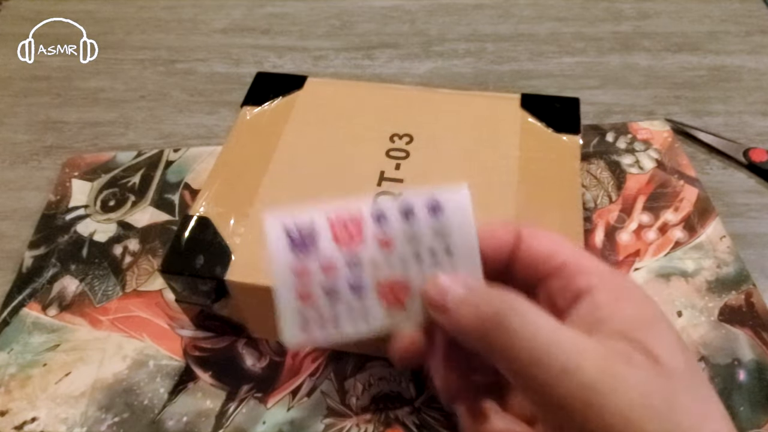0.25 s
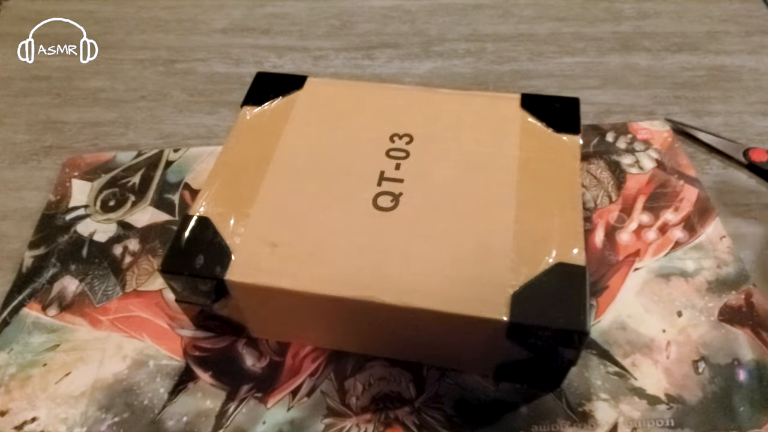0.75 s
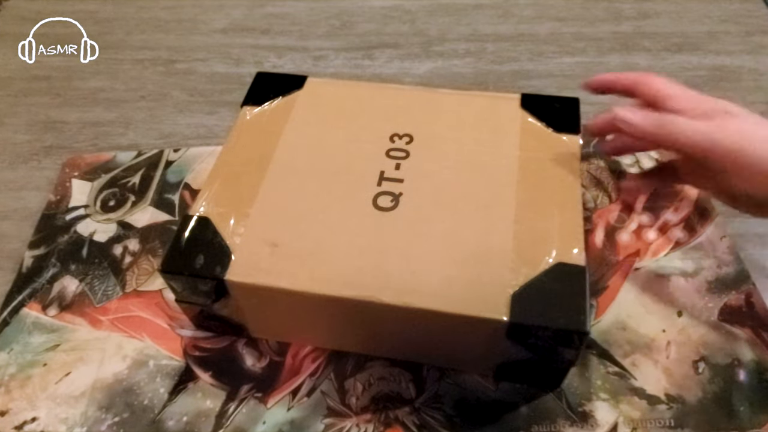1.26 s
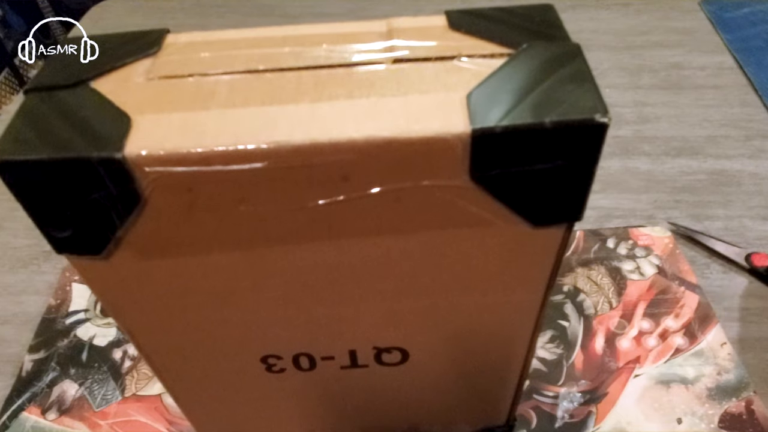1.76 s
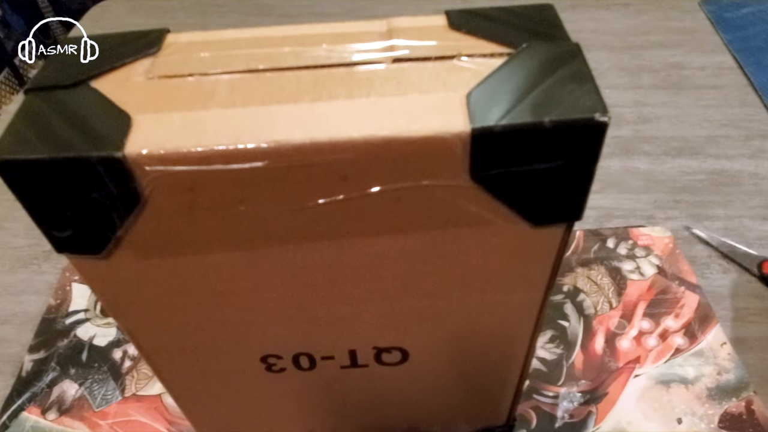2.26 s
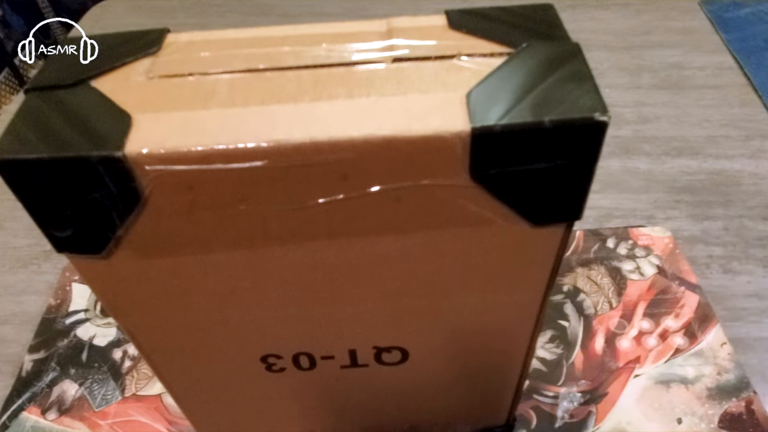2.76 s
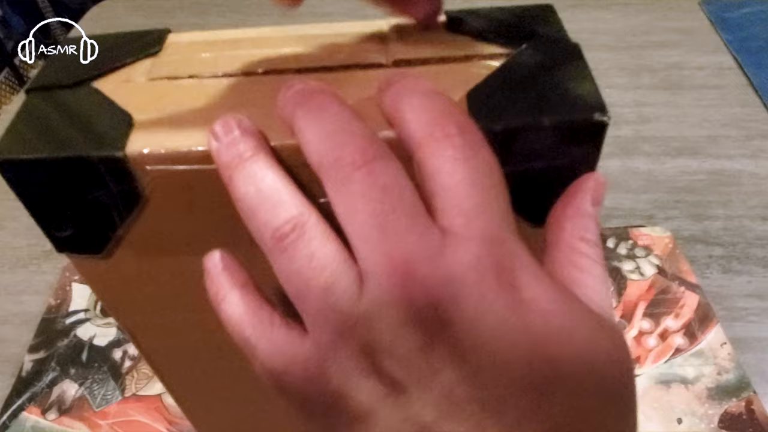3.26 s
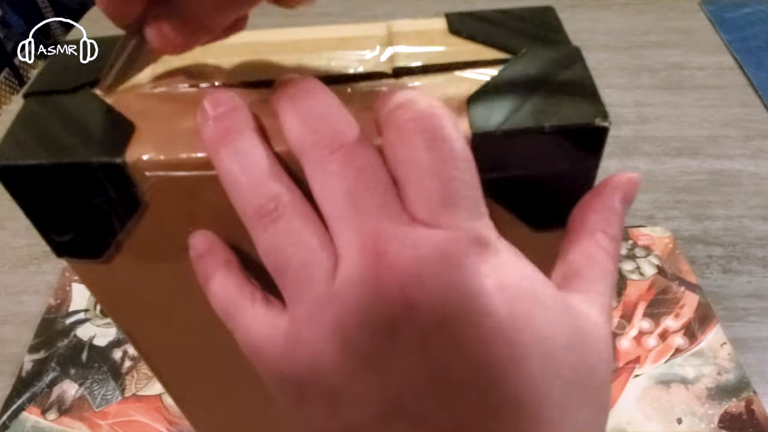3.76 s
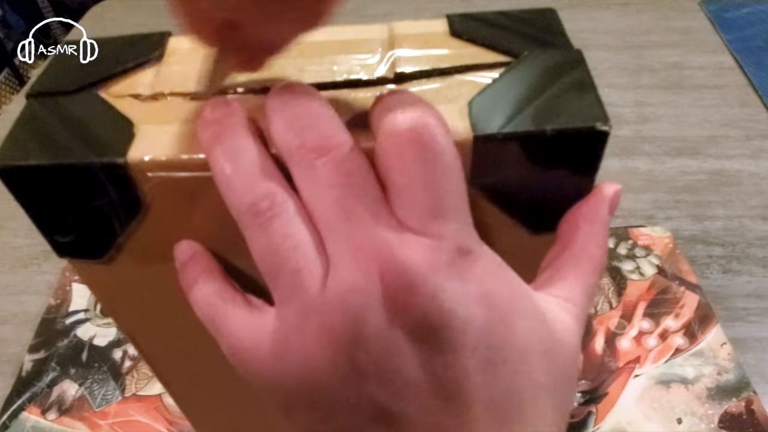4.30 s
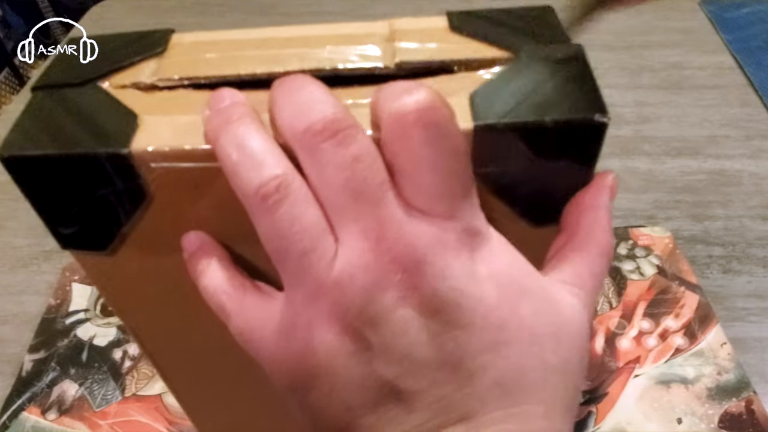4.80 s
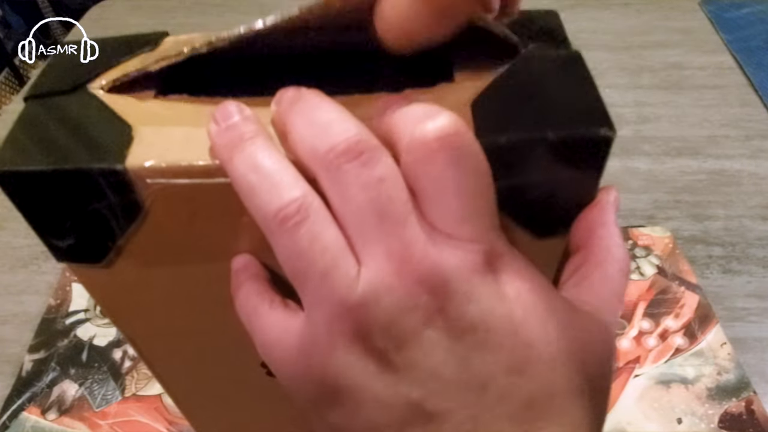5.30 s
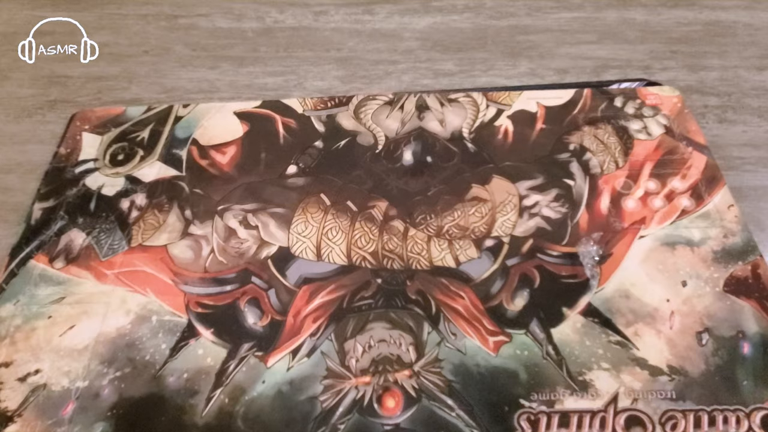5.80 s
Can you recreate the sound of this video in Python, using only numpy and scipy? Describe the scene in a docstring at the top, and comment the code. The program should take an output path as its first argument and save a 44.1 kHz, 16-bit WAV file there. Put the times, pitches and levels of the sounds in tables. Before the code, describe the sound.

In a small quiet room, very close stereo microphones catch faint rustling of a sticker sheet and soft hand touches on a taped cardboard box. The box is set down with a light clack, then tapped and scuffed. A blade pricks the tape, then tears along it in loud, crackling rips with hollow box thumps. The flap creaks and snaps open, and an abrupt cut brings a smooth hissing slide over a mat.

```python
"""Opening a taped cardboard box

Hands handle a sticker sheet and a taped box in a small quiet room, close to a pair of microphones. A blade slits
the tape, the flap creaks and snaps open, and a smooth slide follows. Snaps are clicks, creaks are trains of slips
and rubbing is shaped noise; they excite table, box, panels, tape and crinkle. Four shots are spliced together, so
the echo stops dead at each splice."""
import sys
import numpy as np
from scipy import signal
from scipy.fft import rfft, irfft
from scipy.io import wavfile
from scipy.ndimage import uniform_filter1d

SR = 44100
rng = np.random.default_rng(int(sys.argv[2]) if len(sys.argv) > 2 else 0)


def digitize_waveform(pressure):
    """Quantize a signal to 16-bit integers and store it at the path in sys.argv[1].

    Rows of a 2-D input are taken as channels; values are limited to [-1, 1].
    """
    field = np.atleast_2d(pressure).T
    bounded = np.clip(field, -1, 1)
    quanta = np.round(bounded * 32767).astype(np.int16)
    wavfile.write(sys.argv[1], SR, quanta)


def elevation(decibels):
    """Turn decibel levels (scalar or array-like) into linear amplitude ratios."""
    levels = np.asarray(decibels, float)
    return 10 ** (levels / 20)


N = 266584

# Where each shot starts, and last the end of the final one. Each entry: time in seconds.
SPLICES = [0, 1.565, 4.901, 5.772, 6.05]
# Left-right likeness of spread sound. Each row: frequency in Hz, likeness from 0 to 1.
SAME = [(60, 0.99), (300, 0.88), (700, 0.4), (1500, 0.1), (3000, 0.014)]


def read(points, hz):
    """Reads a table on a log-frequency axis."""
    f, value = np.transpose(points)
    return np.interp(np.log(hz + 1), np.log(f + 1), value)


def evened(x):
    """Scales to rms 1."""
    return x / np.sqrt(np.mean(x ** 2) + 1e-20)


def colour(points):
    """Causal, minimum-phase impulse response of a spectrum in dB, energy 1."""
    gain_db = np.maximum(read(points, abs(np.fft.fftfreq(4096, 1 / SR))), -100)
    log_gain = np.log(elevation(gain_db))
    taps = np.fft.ifft(np.exp(np.conj(signal.hilbert(log_gain)))).real[:2048]
    return taps / np.linalg.norm(taps)


def ring(modes, low_hz):
    """Impulse response of damped modes that start together, high-passed at low_hz, energy 1."""
    t = np.arange(8192) / SR
    taps = np.zeros(len(t))
    for hz, width_hz, db in modes:
        decay = np.sqrt(width_hz) * np.exp(-np.pi * width_hz * t)  # a wider mode dies sooner
        taps += elevation(db) * decay * np.sin(2 * np.pi * hz * t)
    taps = signal.sosfilt(signal.butter(2, low_hz, "high", fs=SR, output="sos"), taps)
    return taps / np.linalg.norm(taps)


def through(x, taps):
    """Convolves shot by shot: whatever still rings is cut off at the splice."""
    edges = [min(round(s * SR), N) for s in SPLICES]
    taps = np.atleast_2d(taps)
    shots = [signal.oaconvolve(x[:, a:b], taps, axes=1)[:, :b - a] for a, b in zip(edges, edges[1:])]
    return np.hstack(shots)


def pair():
    """White noise at two microphones, alike in the bass."""
    a, b = rfft(rng.standard_normal((2, N)))
    same = np.clip(read(SAME, np.fft.rfftfreq(N, 1 / SR)), -1, 1)
    return irfft([a, same * a + np.sqrt(1 - same ** 2) * b], N)


def leaned(pan_db):
    """Gains of left and right, pan_db apart."""
    return elevation(np.array([[.5], [-.5]]) * pan_db)


def placed(x, pan_db):
    """Puts a sound to one side: softer and later at the far microphone."""
    lag_s_per_db = .00003
    lag = round(np.clip(-pan_db * lag_s_per_db * SR, -14, 14))  # samples; positive delays the left
    return leaned(pan_db) * np.array([np.roll(x, max(lag, 0)), np.roll(x, max(-lag, 0))])


def parts(shake, thump, knock, crack, sparkle):
    """Five drives, each into the part that it rings: table, box, panels, tape, crinkle."""
    # Modes of the table top under the box. Each row: frequency in Hz, width in Hz, level in dB.
    table_modes = [(55.7, 12, -9), (76, 12, 1.5), (96, 28, -14)]
    # Modes of the whole box. Each row: frequency in Hz, width in Hz, level in dB.
    box_modes = [(135, 60, -7), (181, 20, -1), (212, 18, 5), (263, 26, 3), (315, 50, 0), (374, 60, -2),
                 (470, 60, -12)]
    # Modes of the card panels. Each row: frequency in Hz, width in Hz, level in dB.
    panel_modes = [(415, 45, -2), (603, 54, -2.5), (738, 102, 1), (935, 240, 0), (1392, 440, 2.5),
                   (1767, 280, -2.5), (2190, 610, -6), (2794, 230, -5), (3467, 260, -6), (4340, 690, -26)]
    # Crack of the tape film. Each row: frequency in Hz, level in dB per Hz.
    tape_spectrum = [(600, -71), (1500, -11.5), (2600, -2), (3500, -1.5), (4500, -2), (6300, -2.5),
                     (7600, -11.5)]
    # The film's highest crinkle. Each row: frequency in Hz, level in dB per Hz.
    crinkle_spectrum = [(6800, -37), (8400, 15), (11000, 14), (15000, 13.5), (16500, -63)]
    body = through(shake, ring(table_modes, 45)) + through(thump, ring(box_modes, 135))
    body = body + through(knock, ring(panel_modes, 546))
    return body + through(crack, colour(tape_spectrum)) + through(sparkle, colour(crinkle_spectrum))


def hush():
    """The quiet room: a low murmur of the building and faint microphone hiss, as shaped noise."""
    # Spectrum of the quiet. Each row: frequency in Hz, relative level in dB per Hz.
    hush_spectrum = [(15, -22), (25, 0), (76, 11), (131, 16), (190, 1), (304, -4), (430, -16), (746, -22),
                     (1800, -27), (4480, -26), (6040, -21), (7510, -20), (8370, -22), (14800, -34),
                     (16500, -74)]
    level_db = -70  # rms
    gain = elevation(read(hush_spectrum, np.fft.rfftfreq(N, 1 / SR)))
    return elevation(level_db) * evened(irfft(rfft(pair()) * gain, N))


def rubbing():
    """Friction noise; the harder the box is loaded, the more it comes in clumps and torn fibres."""
    levels_db = friction_levels()
    load = np.clip((levels_db[1] + 60) / 25, 0, 1)  # from the rumble of the box
    clumps = evened(sum(evened(uniform_filter1d(rng.standard_normal(N), n)) for n in (25, 80, 250)))
    swing_db = 4 * load
    grip = elevation(swing_db * clumps - swing_db ** 2 * np.log(10) / 20)  # uneven grip at constant power
    breaks = rng.random(N) < 450 / SR  # about 450 a second
    fibres = evened(breaks * elevation(4 * np.minimum(rng.exponential(1, N), 4)))
    # from here on one row per part: table, box, panels, tape, crinkle
    torn = .6 * load * np.array([.3, 1, 1, .4, .05])[:, None, None]  # share of power in single breaks
    smooth = np.sqrt(1 - torn) * grip * [pair() for _ in range(5)]
    drive = smooth + np.sqrt(torn) * placed(fibres, -2)
    lean = leaned(np.array([-.5, -5, -3.5, -7.5, -10])[:, None, None])
    return parts(*(lean * elevation(levels_db)[:, None] * drive))


def friction_levels():
    """Friction levels in dB at table, box, panels, tape and crinkle; the layers add in power."""
    power = 1e-12 + rustles() + drags() + table_swells() + scuffs() + cut() + slide()
    return 10 * np.log10(power)


def friction_power(first_part, gain, *levels_db):
    """Power of one friction layer in neighbouring parts, counted from table = 0 to crinkle = 4."""
    power = np.zeros((5, N))
    for part, db in enumerate(levels_db, first_part):
        power[part] = (gain * elevation(db)) ** 2
    return power


def swell(peak_s, half_s):
    """Gain that rises and eases as a bell, inside its own shot."""
    t = np.arange(N) / SR
    shot = np.searchsorted(SPLICES, t, "right") == np.searchsorted(SPLICES, peak_s, "right")
    edge_db = -10.5  # at the half width
    return elevation(np.maximum(edge_db * ((t - peak_s) / half_s) ** 2, -200)) * shot


def rustles():
    """Swells of light hiss and crinkle, alone or on top of other handling, with a softer scrape."""
    # Each row: peak in seconds, half width in seconds, hiss in dB, crinkle in dB.
    light_swells = [(.05, .17, -77, -83), (.34, .045, -69, -78), (.48, .09, -72, -79), (.67, .09, -72, -74),
                    (.785, .05, -60, -85), (.96, 0.11, -78.5, -82), (1.42, .22, -71, -74.5),
                    (1.9, 0.24, -74, -76), (2.97, 0.27, -71, -74.5), (3.19, .05, -80, -71),
                    (3.33, .1, -82, -69), (3.8, .12, -83, -83), (3.88, .03, -76, -69),
                    (4.33, .03, -60, -50), (4.43, .04, -55, -47), (5.23, .04, -60, -45),
                    (5.43, .04, -55, -46), (5.52, .04, -60, -47)]
    scrape_db = -9.5  # relative to the hiss
    return sum(friction_power(2, swell(s, half), hiss_db + scrape_db, hiss_db, crinkle_db)
               for s, half, hiss_db, crinkle_db in light_swells)


def drags():
    """Hand, blade or box drags: friction that swells and eases in all parts but the table."""
    # Each row: peak in seconds, half width in seconds, rumble in dB, scrape in dB, hiss in dB.
    pulls = [(.06, .12, -74, -92, -90), (.79, .05, -68, -61, -75), (1.53, 0.087, -60.5, -63, -70),
             (1.92, .15, -70, -78, -85), (2.175, .02, -52, -62, -75), (2.35, 0.058, -55.5, -66, -76),
             (2.21, .03, -44, -43, -59), (2.53, 0.069, -57, -65.5, -81), (3.0, .25, -71, -90, -83),
             (3.2, 0.064, -62, -88, -85), (3.555, 0.074, -60, -61, -58), (4.03, 0.061, -63, -54, -57.5),
             (4.262, .025, -66, -52, -58), (4.295, .022, -44, -39, -49), (4.32, .02, -36, -45, -55),
             (4.35, 0.026, -48, -48.5, -56), (4.96, .02, -72, -75, -70), (5.012, .035, -52, -51, -47),
             (5.12, 0.036, -54.5, -55, -66), (5.25, .04, -55, -46.5, -56), (6.04, 0.058, -44, -53, -60)]
    crinkle_db = -3.5  # relative to the hiss
    return sum(friction_power(1, swell(s, half), *db, db[-1] + crinkle_db) for s, half, *db in pulls)


def room():
    """Echo of a small room: sparse taps of random sign, each band dying at its own speed."""
    # Each row: frequency in Hz, time to fall 60 dB in seconds.
    decay_times = [(200, 0.34), (600, 0.25), (1500, 0.21), (4000, 0.35), (10000, 0.17)]
    taps = np.zeros((2, SR // 2))
    slots = np.arange(240, SR // 2 - 20, 12)  # samples; the first bounce takes over 5 ms
    at = slots + rng.integers(0, 12, (2, len(slots)))
    np.put_along_axis(taps, at, rng.choice([-1., 1.], at.shape), 1)
    hz, t, z = signal.stft(taps, SR, nperseg=256)
    same = np.clip(read(SAME, hz), -1, 1)[:, None]
    z[1] = same * z[0] + np.sqrt(1 - same ** 2) * z[1]
    decay = elevation(-60 * t / read(decay_times, hz)[:, None])
    tail = signal.istft(z * decay, SR, nperseg=256)[1]
    tail /= np.linalg.norm(tail[0])
    tail[[0, 1], [330, 318]] += .3  # a near wall stands out, a little sooner on the right
    return tail


def swish():
    """The sticker sheet waved through the air: air noise, strongest near its flutter band."""
    # Each row: time in seconds, level in dB.
    wave = [(.295, -100), (.33, -63.5), (.37, -78), (.5, -78), (.68, -97)]
    s, db = np.transpose(wave)
    gain = elevation(np.interp(np.arange(N) / SR, s, db, -120, -120))
    return through(pair() * gain, ring([(1330, 270, -5), (1650, 350, -3)], 900))  # Hz, width Hz, dB


def table_swells():
    """Swells of low noise in the table under the handling and cutting."""
    # Each row: peak in seconds, half width in seconds, level in dB.
    low_swells = [(.48, .1, -67), (.78, .1, -61.5), (1.28, .1, -65), (1.6, .2, -59.5), (2.12, .04, -57),
                  (2.2, .04, -47), (2.42, .03, -51), (2.7, .1, -62), (2.8, .1, -67), (3.05, .08, -64),
                  (3.2, .08, -56), (3.29, .05, -47), (3.385, .03, -52), (3.57, .07, -60), (3.67, .03, -59),
                  (3.95, .04, -58), (4.07, .04, -55), (4.304, .025, -32), (4.42, .05, -36), (4.5, .03, -40),
                  (4.675, .04, -34), (4.81, .04, -31.5), (4.965, .02, -42), (5.02, .08, -50.5),
                  (5.18, .03, -43), (5.27, .03, -39), (5.39, .04, -42), (5.52, .03, -56), (5.7, .05, -51)]
    return sum(friction_power(0, swell(s, half), db) for s, half, db in low_swells)


def scuffs():
    """A hand lands on the card and scuffs to rest: a fast rise and an exponential fall."""
    # Each row: start in seconds, time to fall 20 dB in seconds, rumble in dB, scrape in dB, hiss in dB.
    landings = [(.748, 0.19, -68, -62, -72), (1.01, 0.15, -73, -61, -80), (2.097, .4, -55, -72, -74),
                (2.188, .13, -42.5, -39.5, -52), (2.378, .3, -62, -68, -62), (2.419, 0.1226, -46, -42, -56),
                (3.235, 0.19, -54, -70, -62), (3.375, 0.11, -58, -70, -62.5), (3.635, .1, -56, -60, -80),
                (3.676, .08, -54, -58, -80), (3.94, .1, -55, -46, -54), (4.07, 0.3, -61.5, -54, -53),
                (4.11, .08, -52, -62, -65), (5.135, .07, -46.5, -48, -52), (5.37, 0.05, -62, -39, -36.5),
                (5.46, 0.21, -55, -38.5, -37), (5.554, .12, -61, -45, -50), (5.682, .15, -61, -34, -32.5)]
    rise_s, crinkle_db = .004, -11  # crinkle relative to the hiss
    t, power = np.arange(N) / SR, np.zeros((5, N))
    for s, fall_s, *db in landings:
        gain = np.clip((t - s) / rise_s, 0, 1) * elevation(-20 * abs(t - s) / fall_s)
        power += friction_power(1, gain, *db, db[-1] + crinkle_db)
    return power


def snaps():
    """Sharp clicks inside brief tearing, many with a low thump; returns them near and as the walls get them."""
    # Snaps of tape and ticks on card.
    # Each row: time in seconds, knock in dB, crack in dB, sparkle in dB, left minus right in dB.
    clicks = [(1.0143, -68, -15.5, -17.5, -6.5), (1.4785, -37, -38, -60, -8.5),
              (1.5397, -38.5, -57, -43.5, -7), (1.561, -30.5, -33.5, -40.5, -6),
              (2.1903, -24, -12, -23, -4), (2.3902, -56, -38, -39.5, -7), (2.4225, -20, -18, -45, -1.5),
              (3.236, -62, -33.5, -37, -9.5), (3.257, -44, -31, -31, -9.5), (3.4942, -48.5, -31, -35, -9),
              (3.637, -36, -50, -65, -3.5), (3.676, -29, -36, -57, -3), (3.8906, -42, -42, -40, -2),
              (3.904, -25.5, -26.5, -32, -3), (3.9379, -5, -8.5, -9, -7), (4.0747, -23, -15.5, -46, -11),
              (4.164, -51.5, -32, -38, -14), (4.2013, -39, -23, -31, -5.5), (4.21, -26, -32, -45, -3),
              (4.2157, -58, -22.5, -26.5, -3), (4.252, -22, -30, -45, -3),
              (4.3666, -1.5, -5.5, -10.5, -3.5), (4.3706, 1, -2, -8.5, -6.5), (4.3745, 1, -0.5, -15.5, -2),
              (4.4548, -5.5, -8.5, -40, -1.5), (4.4945, -6, -20, -35, -5), (4.531, -8, -20, -30, -3),
              (4.6043, -28, -12.5, -22.5, -9.5), (4.63, -16, -22, -8.5, -6), (4.6605, -8, -7, -19, -4.5),
              (4.7115, -8, -9, -23, -1), (4.7543, -26, -5.5, -13, -15), (4.7786, -12, -22, -30, 4),
              (4.802, 2, -1.5, -37, -5.5), (4.8474, -9.5, -8.5, -10.5, -8), (4.877, -30, -16, -20, -6),
              (4.8876, -10.5, -5, -14, -9.5), (5.017, -21, -15.5, -50, 6),
              (5.0793, -44, -25.5, -26.5, -3.5), (5.1135, -31, -23, -26, -6),
              (5.1442, -16.5, -22.5, -27.5, -7), (5.1621, -49, -14.5, -28.5, -4),
              (5.1688, -30, -16, -16, -1), (5.1875, -15.5, -22, -20, -4.5), (5.2077, -35, -9, -13, -2),
              (5.2104, -27, -13.5, -20, -9), (5.3649, -10, -15, -14, -5.5), (5.3692, -16, -2, -13, -12),
              (5.405, -28, -19, -16, 8.5), (5.461, -4.5, .5, -1, -1.5), (5.4638, -8, -5, -8, -3),
              (5.468, -14, -9, -10, -3), (5.5548, -12, -4.5, -22, -15.5), (5.5783, -47, -12, -10, -5.5),
              (5.662, -46, -41, -24.5, 1), (5.6755, -4.5, -13, -10.5, -3)]
    # Low thump of the box under the snaps. Each row: time in seconds, thump in dB.
    thumps = [(1.4786, -33.5), (1.5396, -27), (2.0985, -31), (2.1902, -11.5), (2.3902, -27), (2.4227, -15),
              (3.236, -24.5), (3.257, -18), (3.3754, -25), (3.676, -23), (3.904, -27.5), (3.9379, -12),
              (4.3666, 8), (4.4548, -3.5), (4.4945, -1), (4.531, -4), (4.6735, -2.5), (4.7116, -5.5),
              (4.7784, -6), (4.802, 2), (4.8473, -4.5), (5.1442, -12.5), (5.3648, -11), (5.461, -18),
              (5.677, -16)]
    # one drive each for thump, knock, crack and sparkle
    near, far, t = np.zeros((4, 2, N + 800)), np.zeros((4, 1, N)), np.arange(400) / SR
    tearing = .2 * np.exp(-abs(t - .0007) / np.where(t < .0007, .0004, .0014))
    bursts = rng.standard_normal((len(clicks), 400)) * tearing
    run_up = 31  # samples, 0.7 ms
    bursts[:, run_up] = 1  # the film lets go after a short run-up
    for s, thump_db in thumps:
        far[0, 0, round(s * SR)] += elevation(thump_db)
    near[0, :, :N] = placed(np.roll(far[0, 0], run_up), -4)
    for (s, *levels_db, pan_db), burst in zip(clicks, bursts):
        at = round(s * SR)
        far[1:, 0, at] += elevation(np.array(levels_db))  # all directions mix: no grain of its own is left
        burst, pan_db = np.r_[burst, np.zeros(40)], np.clip(pan_db, -15, 15)
        for drive, db, side in zip(near[1:], levels_db, (.73, 1, .94)):  # bass is heard nearer the middle
            drive[:, at:at + 440] += elevation(db) * placed(burst, side * pan_db)
    near = near[:, :, :N]
    return parts(.34 * near[0], *near), parts(.6 * far[0], *far)[0]  # thumps shake the table too


def cut():
    """The blade runs along the seam: unbroken friction of changing strength, up to the splice."""
    # Each row: time in seconds, rumble of the box in dB, scrape of card in dB, hiss of tape in dB.
    blade = [(4.367, -40, -31, -48), (4.43, -30, -31, -42), (4.514, -27, -32, -37.5),
             (4.56, -24, -30, -39.5), (4.6, -31, -31, -40), (4.652, -33, -39, -36.5),
             (4.726, -30, -31, -36.5), (4.745, -38, -35.5, -41), (4.765, -31, -30, -33.5),
             (4.808, -40, -46.5, -43), (4.858, -42, -49, -35), (4.94, -60, -70, -70)]
    crinkle_db = -10  # relative to the hiss
    t = np.arange(N) / SR
    s, *columns = np.transpose(blade)
    levels_db = [np.interp(t, s, db, -200, -200) for db in columns]
    return friction_power(1, t < SPLICES[2], *levels_db, levels_db[-1] + crinkle_db)


def creak():
    """The pulled flap sticks and slips evenly; slips shake the box and tick the fold of the flap."""
    # Each row: time in seconds, slips per second, level in dB.
    pull = [(5.274, 75.3, -29.5), (5.291, 82, -22), (5.312, 101.7, -25.5), (5.337, 120, -29.5),
            (5.353, 83, -25)]
    s, rate, db = np.transpose(pull)
    t = np.arange(N) / SR
    turns = np.cumsum(np.interp(t, s, rate, 0, 0)) / SR
    spread_db = 1.5 * rng.standard_normal(N)
    slips = np.diff(np.floor(turns + .9), prepend=0)  # one click per whole turn
    slips = slips * elevation(np.interp(t, s, db) + spread_db)
    grit = np.convolve(slips, np.exp(-np.arange(400) / 90))[:N] * rng.standard_normal(N)  # 2 ms decay
    fold_modes = [(1750, 330, 0), (3400, 600, -12)]  # Hz, width Hz, dB
    fold = through(placed(slips, -3), elevation(17) * ring(fold_modes, 900))
    drives = (slips * elevation(15), slips * elevation(24), slips * elevation(18), grit * elevation(-5), grit * elevation(-14))
    return fold + parts(*(placed(x, -4) for x in drives))


def slide():
    """Something smooth slides over the mat: steady friction, mostly hiss and crinkle."""
    # Each row: time in seconds, hiss in dB.
    glide = [(5.772, -41.5), (5.9, -38.5), (6.05, -38)]
    s, db = np.transpose(glide)
    gain = elevation(np.interp(np.arange(N) / SR, s, db, -200, -200))
    return friction_power(1, gain, -20.5, -10.5, 0, .2)  # rumble, scrape, hiss, crinkle


def scene():
    """Near sounds and their echo, faded over 3 ms into each splice, on the quiet of the room."""
    hits, far_hits = snaps()
    flap = creak()
    rub = rubbing() + swish()
    feed = elevation(-2) * far_hits + elevation(-4) * flap.mean(0) + elevation(-14) * rub.mean(0)  # what the walls get
    t = np.arange(N) / SR
    to_splice_s = np.take(SPLICES, np.searchsorted(SPLICES, t, "right")) - t
    handling = hits + flap + rub + through(feed[None], room())
    return hush() + handling * np.clip(to_splice_s / .003, 0, 1)


def top_cut(x):
    """Nothing passes above the cut-off."""
    return signal.sosfilt(signal.butter(12, 17100, fs=SR, output="sos"), x)


def record(dry):
    """Rumble filter of the recorder: a high-pass at 35 Hz."""
    mix = signal.sosfilt(signal.butter(2, 35, "high", fs=SR, output="sos"), dry)
    return top_cut(mix)


dry = scene()
out = record(dry)
digitize_waveform(out)
```